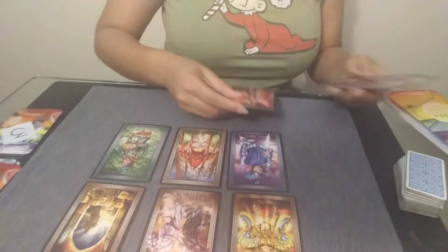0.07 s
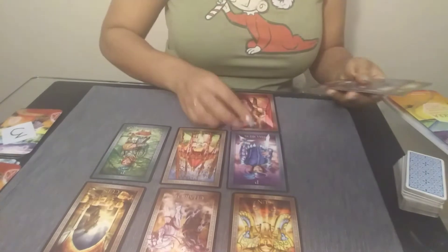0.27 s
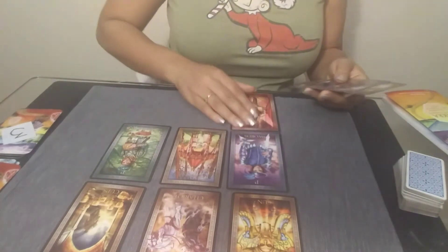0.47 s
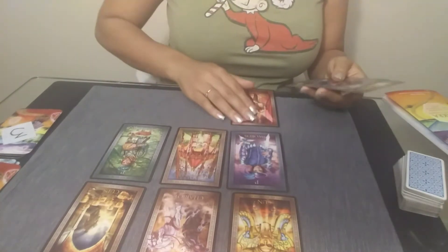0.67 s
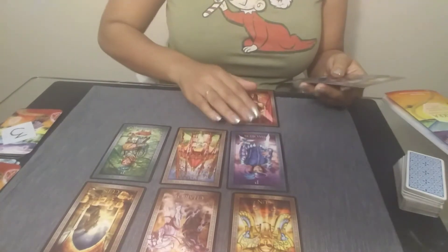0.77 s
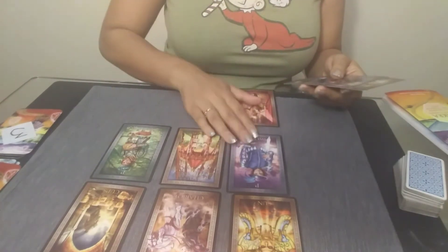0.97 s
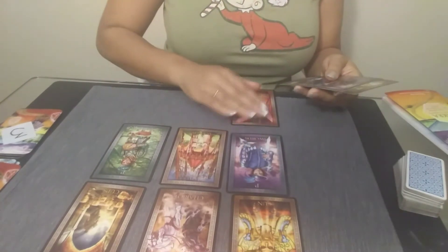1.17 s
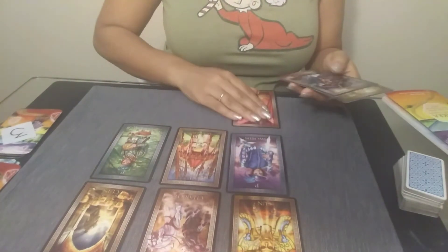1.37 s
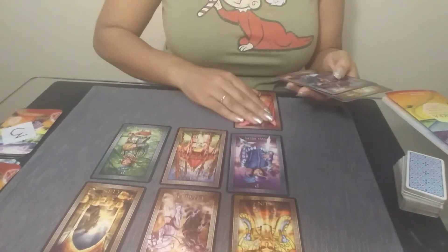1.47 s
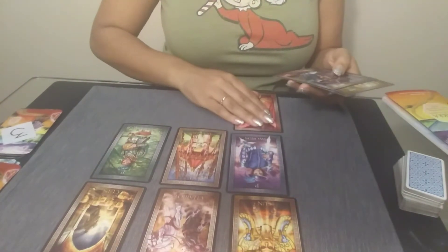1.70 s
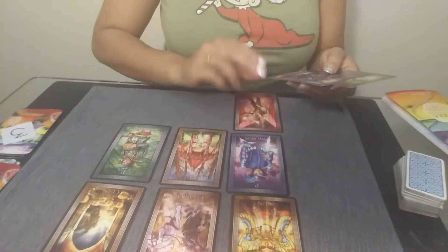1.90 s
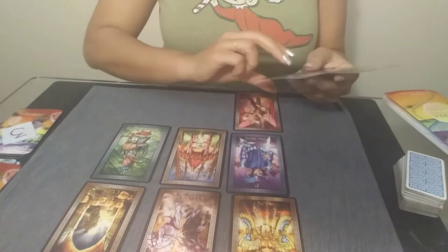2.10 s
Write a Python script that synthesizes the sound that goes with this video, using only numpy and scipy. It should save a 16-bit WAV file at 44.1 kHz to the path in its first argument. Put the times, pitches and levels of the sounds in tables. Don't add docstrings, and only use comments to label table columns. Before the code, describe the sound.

One loud, crisp card snap comes early, after soft brushing and a short creak. Faint rubs and nail ticks follow, then a bright flick off the deck at the end, in a small echoing room with faint hiss.

```python
import sys
import numpy as np
from scipy import signal
from scipy.fft import rfft, irfft, next_fast_len
from scipy.io import wavfile
from scipy.ndimage import map_coordinates

SR = 44100
rng = np.random.default_rng(int(sys.argv[2]) if len(sys.argv) > 2 else 0)


def invert_db(x):
    u = np.asarray(x, float) / 20
    return 10 ** u


def file_out(sig):
    cols = np.atleast_2d(sig).T
    lim = np.clip(cols, -1, 1)
    pcm = np.round(lim * 32767).astype(np.int16)
    wavfile.write(sys.argv[1], SR, pcm)


N = 94638


def unit(x):
    return x / np.sqrt(np.mean(x ** 2) + 1e-20)


def along(points, hz):
    f, v = np.transpose(points)
    return np.interp(np.log(hz + 1), np.log(f + 1), v)


def filtered(x, response):
    m = next_fast_len(len(x) + 8192)
    return irfft(rfft(x, m) * response(np.fft.rfftfreq(m, 1 / SR)), m)[:len(x)]


def resonance(f, centre, width, db):
    return invert_db(db) * 1j * f * width / (centre ** 2 - f ** 2 + 1j * f * width)


def body(peaks):
    return lambda f: sum((-1) ** k * resonance(f, *peak) for k, peak in enumerate(peaks))


def add(out, s, x):
    i = round(s * SR)
    out[max(i, 0):i + len(x)] += x[max(-i, 0):len(out) - i]


def slips(rows, peaks, jitter, scatter_db):
    out = np.zeros(N)
    for s, length, db, rate in rows:
        draw = rng.standard_normal((60, 3))
        when = (np.arange(60) + .5 + jitter * draw[:, 0]) / rate
        arch = np.sin(np.pi * np.clip(when / length, 0, 1))
        size = np.sqrt(np.clip(arch, 0, 1)) * invert_db(scatter_db * draw[:, 1])
        train = np.bincount(np.clip(when * SR, 0, 4000).astype(int), size, minlength=4096)
        ring = filtered(train, body(peaks))
        stroke_rms = np.sqrt(np.sum(ring ** 2) / (length * SR) + 1e-20)
        add(out, s, invert_db(db) * ring / stroke_rms)
    return out


def hum():
    # f/Hz, level/dB per Hz
    tone_shape = [(20, -59), (100, -25), (160, -10), (250, -4), (1000, -6), (2000, -14), (4700, -18.5),
                  (5400, -26.5)]
    hiss_shape = [(4000, -1.5), (6000, -21), (8500, -18), (9300, 4), (12000, -1), (15400, 3), (15650, -38),
                  (16600, -20)]
    tone_db, drift_db, hiss_db = -64.5, .6, -80.5
    drift = map_coordinates(rng.standard_normal(24), [np.arange(N) * 8 / SR])
    tone = unit(filtered(rng.standard_normal(N), lambda f: invert_db(along(tone_shape, f))))
    hiss = unit(filtered(rng.standard_normal(N), lambda f: invert_db(along(hiss_shape, f))))
    return invert_db(tone_db + drift_db * drift) * tone + invert_db(hiss_db) * hiss


def slides():
    # start t/s, length t/s, level/dB, brightness/dB per octave
    strokes = [(-.05, 0.088, -60.5, 4), (0.048, 0.033, -61.5, 1.5), (0.176, 0.028, -66.5, -1),
               (0.221, .05, -60.5, 6.5), (0.531, 0.1, -64, 5), (.74, 0.01, -69.5, 7),
               (0.946, 0.055, -65, 1), (1.02, 0.048, -72.5, 4), (1.368, 0.24, -69, 3),
               (1.763, 0.023, -73.5, 1.5), (1.815, 0.041, -70, -0.5)]
    # f/Hz, level/dB per Hz
    rub_shape = [(400, -22), (1200, 1), (2500, 2.5), (4500, -1), (6500, -5.5), (9000, -4), (12000, -10),
                 (16000, -28)]
    rise_share, fall_s, grit_per_s, grit_share = 0.33, 0.019, 1100, 0.5
    out = np.zeros(N)
    t = np.arange(SR // 2) / SR
    for s, length, db, tilt_db in strokes:
        noise, chance = rng.standard_normal(len(t)), rng.random(len(t))
        grit = unit(noise * (chance < grit_per_s / SR))
        tilted = lambda f: invert_db(along(rub_shape, f) + tilt_db * np.log2((f + 50) / 5000))
        rub = unit(filtered(noise + grit_share * grit, tilted))
        swell = np.clip(t / (rise_share * length), 0, 1)
        fade = np.exp(-np.clip(t - length, 0, None) / fall_s)
        add(out, s, invert_db(db) * swell * fade * rub)
    return out


def ticks():
    # t/s, peak level/dB, ring f/Hz, bump level over the click/dB
    contacts = [(.0005, -48, 3500, -3), (.185, -51, 3000, -3), (.191, -54, 2000, 4), (.232, -40, 3500, 0),
                (.238, -48, 3400, 0), (.5345, -50, 3000, -15), (.5365, -46, 3000, -15),
                (.558, -40, 3600, -15), (.9538, -46, 3400, -20), (.971, -45, 3300, -20),
                (.999, -46, 3400, -15), (1.369, -52, 3500, -15), (1.51, -55, 4000, -19),
                (1.597, -54, 4000, -15)]
    tick_q, tick_s, bump_hz, bump_s = 1.5, .0015, 900, .012
    out, t = np.zeros(N), np.arange(2048) / SR
    for s, db, hz, bump_db in contacts:
        puff = rng.standard_normal((2, len(t)))
        click_modes = body([(hz, hz / tick_q, 0), (2.15 * hz, hz, -9)])
        tick = filtered(puff[0] * invert_db(-60 * t / tick_s / 2), click_modes)
        bump = filtered(puff[1] * invert_db(-60 * t / bump_s / 2), body([(bump_hz, bump_hz, 0)]))
        tick, bump = tick / np.abs(tick).max(), bump / np.abs(bump).max()
        add(out, s, invert_db(db) * (tick + invert_db(bump_db) * bump))
    return out


def touch_down():
    # start t/s, length t/s, level/dB, slip rate f/Hz
    touches = [
        (.221, 0.0233, -52.5, 460),
        (0.046, 0.027, -60.5, 320),
    ]
    # f/Hz, width f/Hz, level/dB
    cloth = [(306, 165, 3), (540, 370, 2.5), (1026, 900, -5)]
    return slips(touches, cloth, jitter=.3, scatter_db=2.2)


def nudges():
    # start t/s, length t/s, level/dB, slip rate f/Hz
    pushes = [
        (.189, .004, -53, 1500),
        (.197, .006, -61, 1500),
        (.5545, .006, -52, 2000),
        (.561, .008, -54, 2000),
        (.056, .008, -56, 1500),
    ]
    # f/Hz, width f/Hz, level/dB
    flat_card = [(1300, 640, 2.5), (2460, 860, 6), (4000, 720, 2.5), (9500, 4400, -12)]
    return slips(pushes, flat_card, jitter=0.37, scatter_db=4)


def creak():
    # start t/s, length t/s, level/dB, slip rate f/Hz
    creaks = [
        (.2805, .003, -50, 1500),
        (.2825, .008, -38.5, 950),
    ]
    spring = [
        (.2895, .0065, -38, 1300),
    ]
    # f/Hz, width f/Hz, level/dB
    bent_card = [(320, 150, -6), (1080, 200, -6), (1890, 150, 0), (2650, 300, -10), (4880, 600, -13),
                 (9500, 800, -17), (12500, 3000, -31)]
    taut_card = [(2680, 150, 0), (3400, 600, -13), (5800, 900, -20)]
    bending = slips(creaks, bent_card, jitter=.12, scatter_db=1.5)
    return bending + slips(spring, taut_card, jitter=0.14, scatter_db=2.2)


def lead_in():
    # start t/s, length t/s, level/dB, slip rate f/Hz
    burst = [
        (.3215, .0055, -40, 6000),
    ]
    # f/Hz, width f/Hz, level/dB
    scrape = [(2440, 2500, -6), (5030, 4200, 0), (8450, 5300, -1), (12400, 640, -18)]
    return slips(burst, scrape, jitter=0.54, scatter_db=4.8)


def snap():
    # f/Hz, width f/Hz, level/dB
    card_modes = [(2250, 600, -8), (2940, 600, 0), (4200, 900, -6), (7100, 1000, -14), (8730, 500, -10),
                  (11400, 1000, -17)]
    table_modes = [(40, 30, -16), (205, 71, -3.5), (495, 220, 0.5), (830, 450, -7)]
    snap_s, click_db, ring_db, push_db = .3276, -3.5, 12.5, 0.5
    click_hz, soft_hz, dull_hz = 1150, 6500, 13500
    blow = np.zeros(N)
    blow[round(snap_s * SR)] = 1

    def response(f):
        thin = (1j * f / (click_hz + 1j * f)) ** 2 / (1 + (f / dull_hz) ** 4)
        click = invert_db(click_db) / (1 + (f / soft_hz) ** 2)
        ring = invert_db(ring_db) * sum(resonance(f, *mode) for mode in card_modes)
        return -thin * (click + ring) - invert_db(push_db) * body(table_modes)(f)

    return filtered(blow, response)


def flap():
    # start t/s, length t/s, level/dB, blow rate f/Hz
    flutter = [
        (.3288, .0035, -29, 2500),
    ]
    # f/Hz, width f/Hz, level/dB
    flapping = [(2250, 430, 2), (3150, 1200, 1), (4470, 1600, -12), (9300, 2800, -11)]
    return slips(flutter, flapping, jitter=.5, scatter_db=2.1)


def flick():
    # start t/s, length t/s, level/dB, slip rate f/Hz
    rake = [
        (1.9474, .0032, -24.5, 4000),
    ]
    let_go = [
        (1.9448, .003, -37, 6000),
        (1.9502, .0032, -24, 3500),
    ]
    # f/Hz, width f/Hz, level/dB
    deck_edge = [(505, 270, -16), (1120, 150, -16.5), (2100, 780, -21.5), (3710, 200, -17),
                 (4510, 400, -2.5), (5300, 470, 0.5), (7200, 360, -15), (9200, 540, -3), (11100, 680, -18),
                 (13400, 1200, -32)]
    card_edge = [(1190, 600, -16.5), (2120, 1040, -19), (3600, 470, -12), (5500, 320, -6), (6630, 650, -2),
                 (9100, 600, -10), (10500, 700, -14), (13700, 1000, -33)]
    deck = slips(rake, deck_edge, jitter=0.55, scatter_db=4)
    return deck + slips(let_go, card_edge, jitter=.5, scatter_db=4)


def room(x):
    # delay t/s, level/dB
    walls = [(.0011, -11), (.0057, -9), (.0078, -14), (.0106, -13), (.0131, -12), (.0165, -21), (.024, -19),
             (.03, -17)]
    # f/Hz, 60 dB decay t/s
    decay = [(200, 0.29), (1000, 0.37), (3000, 0.28), (7000, 0.27), (14000, 0.23)]
    tail_db, tail_delay_s, wall_hz = -4.5, .003, 6800
    hz, t, z = signal.stft(rng.standard_normal(SR // 2), SR, nperseg=128)
    dying = z * invert_db(-60 * t / along(decay, hz)[:, None])
    tail = signal.istft(dying, SR, nperseg=128)[1]
    answer = np.zeros(N)
    add(answer, tail_delay_s, invert_db(tail_db) * tail / np.linalg.norm(tail))
    for s, db in walls:
        answer[round(s * SR)] += invert_db(db)
    reflected = signal.fftconvolve(x, answer[:SR])[:N]
    return x + filtered(reflected, lambda f: wall_hz / (wall_hz + 1j * f))


def scene():
    low_cut_hz, top_hz, hiss_top_hz, order = 100, 15550, 15700, 120
    bend = creak() + touch_down()
    fingers = ticks() + slides() + nudges()
    snapping = snap() + lead_in() + flap()
    near = room(snapping) + room(bend + fingers) + room(flick())
    cut = lambda f: (1j * f / (low_cut_hz + 1j * f)) ** 2 / (1 + (f / top_hz) ** order)
    top = lambda f: 1 / (1 + (f / hiss_top_hz) ** (2 * order))
    return (filtered(near, cut) + filtered(hum(), top))[None]


def band_limit(x):
    return signal.sosfilt(signal.butter(12, 16800, fs=SR, output="sos"), x)


def record(dry):
    return band_limit(dry)


dry = scene()
out = record(dry)
file_out(out)
```